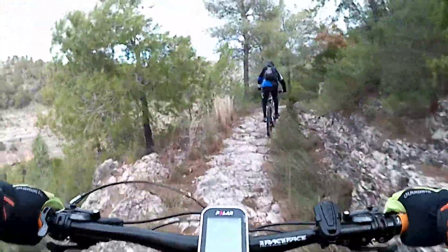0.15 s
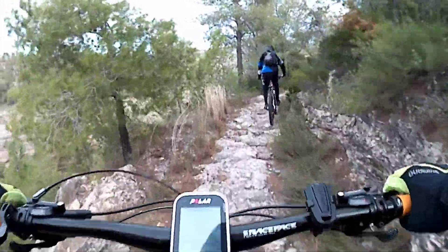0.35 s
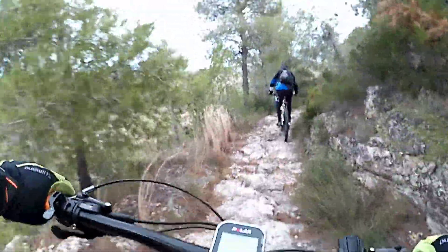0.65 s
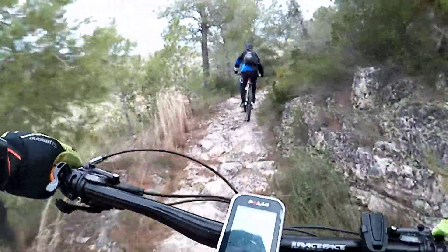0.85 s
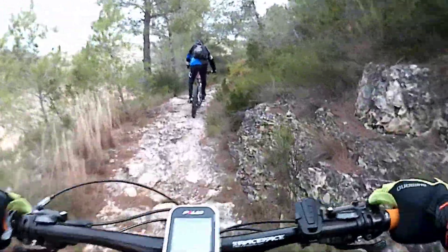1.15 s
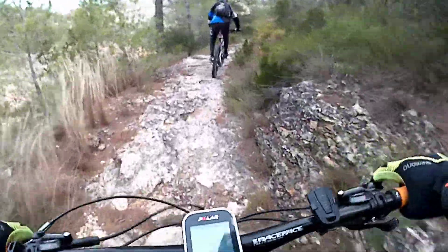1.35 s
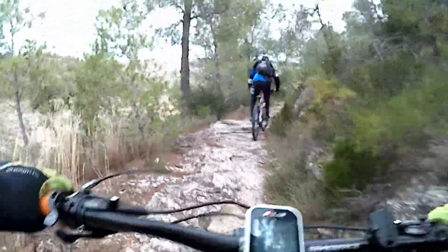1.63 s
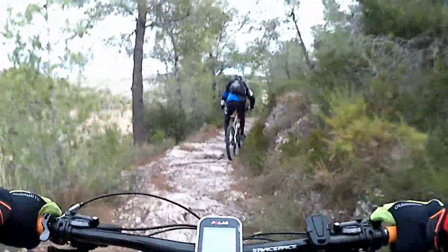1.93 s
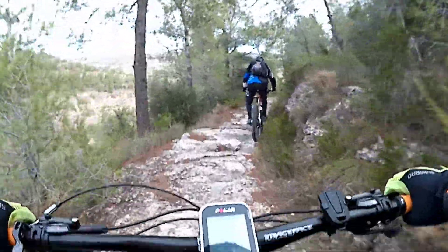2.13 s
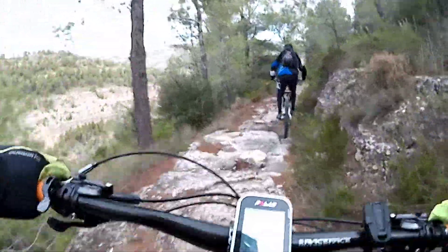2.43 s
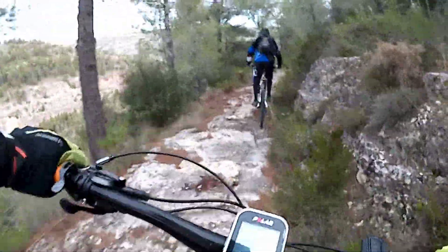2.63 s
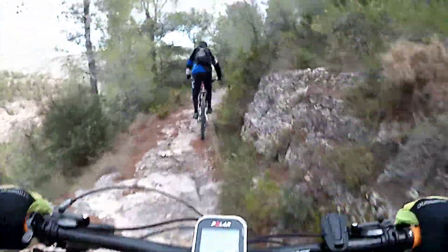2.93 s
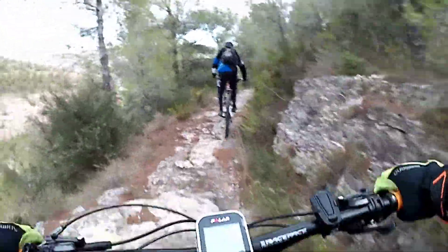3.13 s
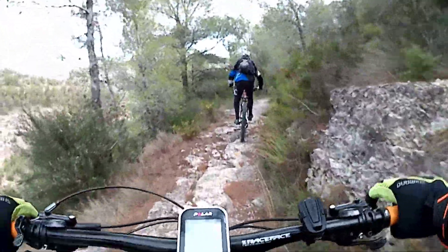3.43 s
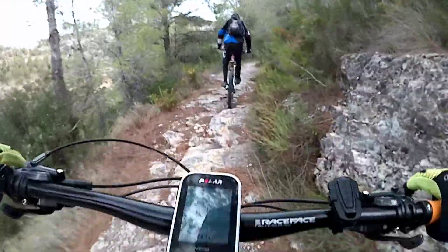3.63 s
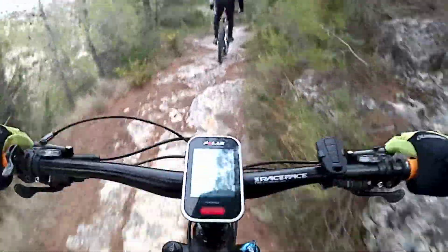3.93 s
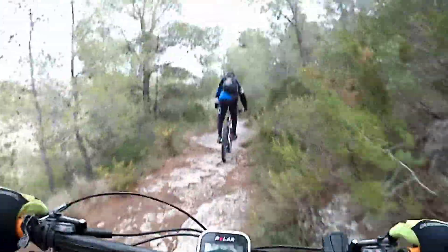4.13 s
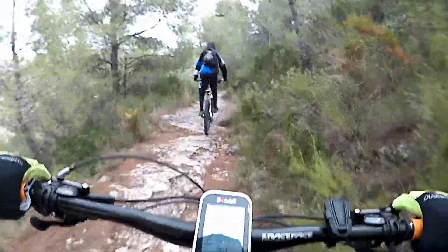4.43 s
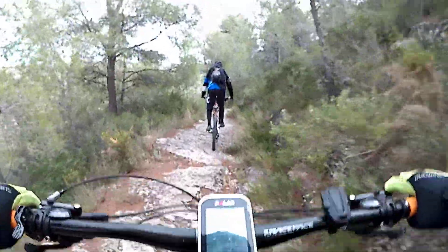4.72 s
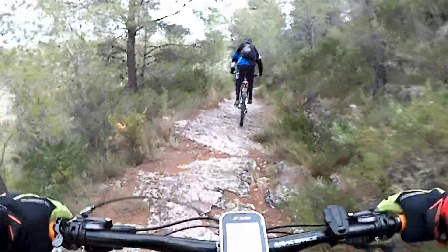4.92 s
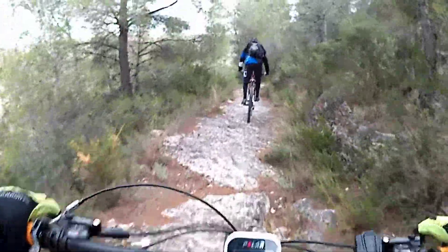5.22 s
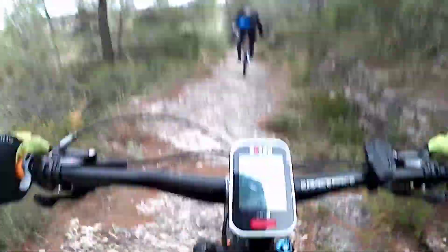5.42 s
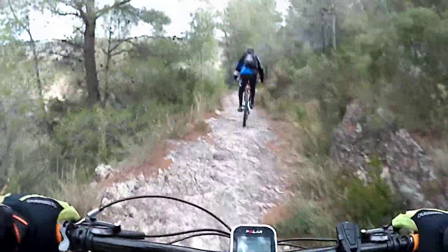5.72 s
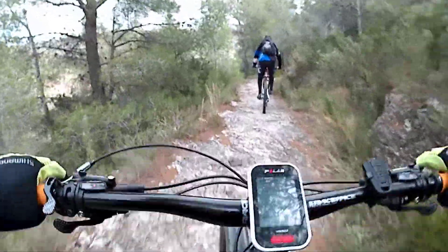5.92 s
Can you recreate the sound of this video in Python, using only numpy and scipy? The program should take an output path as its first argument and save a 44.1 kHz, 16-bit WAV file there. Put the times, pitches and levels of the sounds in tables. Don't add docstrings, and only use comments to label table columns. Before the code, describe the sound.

A mountain bike clatters over rocky ground, the handlebar camera's loose housing knocking and rattling amid heavy low bumps that clip, muffled and harsh.

```python
import sys
import numpy as np
from scipy import signal
from scipy.io import wavfile
from scipy.ndimage import uniform_filter1d

SR = 44100
rng = np.random.default_rng(int(sys.argv[2]) if len(sys.argv) > 2 else 0)


def to_linear_factor(level_db):
    exponent = np.asarray(level_db, float) / 20
    return 10 ** exponent


def store_wav(level_fs):
    pcm = np.round(np.clip(np.atleast_2d(level_fs), -1, 1) * 32767)
    wavfile.write(sys.argv[1], SR, pcm.T.astype(np.int16))


N = 267554

# [t/s, pressure/full scale, duration/ms]
LIFTS = [(0.065, 0.43, 8.1), (0.237, 0.68, 13.5), (0.266, 0.44, 4.2), (0.392, 0.65, 13.8),
         (0.437, 0.36, 8.3), (0.495, 0.4, 2.9), (0.559, 0.73, 9.7), (0.574, 0.28, 10.6),
         (0.739, 0.29, 19.2), (1.104, 0.79, 5.2), (1.187, 0.74, 10.8), (1.215, 0.74, 3.3),
         (1.224, 0.24, 6.0), (1.287, 0.26, 19.6), (1.438, 0.87, 6.4), (1.533, 0.85, 6.3),
         (1.643, 0.58, 10.4), (1.774, 0.37, 12.1), (1.779, 0.89, 3.3), (1.796, 0.47, 4.9),
         (2.031, 0.42, 4.9), (2.226, 1.03, 4.5), (2.293, 0.8, 7.3), (2.422, 0.9, 6.7), (2.435, 0.53, 7.9),
         (2.71, 0.54, 15.5), (2.851, 0.89, 13), (3.035, 0.37, 3.5), (3.037, 0.48, 24.2), (3.056, 0.21, 7.8),
         (3.072, 0.73, 7.0), (3.132, 0.35, 5.2), (3.22, 1.19, 6.4), (3.404, 0.49, 12.1), (3.61, 0.57, 11.6),
         (3.683, 0.44, 3.0), (3.717, 0.79, 5.6), (3.754, 0.63, 3), (4.013, 1.05, 3.3), (4.082, 0.65, 11.8),
         (4.145, 0.48, 6.9), (4.237, 0.75, 12.8), (4.267, 0.44, 4.3), (4.405, 0.22, 14.0),
         (4.42, 1.05, 3.5), (4.599, 0.64, 9.8), (4.796, 0.43, 10.8), (5.062, 0.2, 14.3), (5.161, 0.44, 5.5),
         (5.172, 0.21, 9.2), (5.308, 0.87, 5.8), (5.456, 1.34, 5.4), (5.504, 0.81, 12.1), (5.636, 1, 11.5),
         (5.739, 0.23, 21.0), (5.81, 0.39, 10.2), (5.925, 0.41, 13.4), (6.047, 0.79, 9.1)]
# [t/s, suction/full scale, duration/ms]
DROPS = [(0.009, 0.48, 5.9), (0.023, 0.42, 19.6), (0.11, 0.61, 7.3), (0.156, 0.32, 6.7), (0.214, 0.24, 7.2),
         (0.288, 0.59, 13), (0.311, 0.23, 30.0), (0.423, 0.27, 14.7), (0.465, 0.54, 15.0),
         (0.612, 1.59, 4.7), (0.792, 0.21, 10), (0.973, 0.21, 17.0), (1.105, 1.09, 13.0),
         (1.158, 0.41, 25.8), (1.253, 0.89, 9.5), (1.276, 0.28, 8.2), (1.459, 0.26, 29.9),
         (1.483, 0.56, 13), (1.554, 0.57, 16.6), (1.567, 1.18, 8.0), (1.69, 0.94, 10.6), (1.792, 1.05, 3.3),
         (1.813, 0.36, 25), (1.883, 0.22, 15), (1.939, 1.99, 7.06), (1.944, 0.46, 15.7), (2.053, 0.34, 9.3),
         (2.257, 0.7, 17.1), (2.326, 0.19, 19.6), (2.343, 0.92, 6.4), (2.508, 1.1, 7.1), (2.74, 0.63, 14),
         (2.944, 1.56, 10.1), (2.967, 0.34, 8.4), (3.126, 0.39, 3.0), (3.13, 0.62, 17.2), (3.366, 0.75, 7),
         (3.482, 0.9, 7.8), (3.665, 0.48, 17.1), (3.747, 1.05, 3.0), (3.756, 0.67, 3.3),
         (3.766, 0.36, 30.0), (3.877, 0.22, 17.7), (3.973, 0.19, 14.3), (4.04, 0.38, 14.5),
         (4.154, 0.64, 17.4), (4.328, 1.15, 10.1), (4.415, 0.46, 3.0), (4.439, 0.67, 8.4),
         (4.672, 1.09, 8.2), (4.826, 0.28, 20.1), (4.889, 0.76, 7.7), (5.234, 0.55, 8.5), (5.33, 0.9, 9.0),
         (5.461, 0.83, 20.1), (5.526, 0.66, 7.4), (5.638, 0.8, 3.4), (5.712, 1.6, 6.6), (5.831, 0.62, 7.6),
         (6.009, 0.6, 11.7)]
# [t/s, pressure/full scale (+ up, - down), duration/ms]
NUDGES = [(0.2, -0.15, 15), (0.231, -0.24, 3.5), (0.279, -0.18, 3.5), (0.289, -0.18, 3.5),
          (0.303, -0.16, 5), (0.477, 0.17, 7), (0.53, 0.13, 15), (0.846, -0.12, 15), (1.027, 0.16, 5),
          (1.048, 0.15, 7), (1.078, 0.12, 15), (1.312, -0.19, 7), (1.335, -0.16, 10), (1.511, -0.16, 7),
          (1.661, -0.12, 15), (1.839, 0.14, 10), (2.04, 0.17, 5), (2.189, -0.12, 15), (2.217, 0.22, 5),
          (2.23, 0.18, 5), (2.594, -0.14, 15), (2.647, 0.12, 15), (2.812, -0.13, 15), (3.228, -0.2, 3.5),
          (3.242, -0.17, 5), (3.355, -0.17, 7), (3.391, -0.2, 3.5), (3.43, 0.17, 10), (3.474, 0.14, 10),
          (3.535, -0.11, 15), (3.713, -0.19, 3.5), (3.739, -0.16, 15), (3.757, 0.18, 3.5),
          (3.811, 0.15, 15), (3.937, 0.15, 7), (3.989, -0.13, 7), (4.02, -0.28, 3.5), (4.156, 0.19, 3.5),
          (4.19, 0.11, 15), (4.296, 0.12, 10), (4.352, 0.15, 10), (4.417, 0.36, 3.5), (4.426, -0.22, 3.5),
          (4.897, -0.21, 3.5), (5.191, -0.21, 3.5), (5.261, 0.13, 15), (5.302, -0.23, 3.5),
          (5.373, 0.16, 15), (5.443, 0.22, 3.5), (5.515, 0.18, 3.5), (5.7, -0.14, 7), (5.72, -0.18, 5),
          (5.947, 0.17, 5), (5.997, -0.13, 15), (6.006, 0.22, 3.5), (6.01, -0.2, 3.5)]


def jolts():
    out, t = np.zeros(N), np.arange(N) / SR
    falls = [(s, -suction, ms) for s, suction, ms in DROPS]
    for s, push, width_ms in [*LIFTS, *falls, *NUDGES]:
        near = slice(max(int((s - .06) * SR), 0), int((s + .06) * SR))
        offset_ms = (t[near] - s) * 1000
        out[near] += push * np.exp(-4 * np.log(2) * (offset_ms / width_ms) ** 2)
    vent_hz = 11.2
    return signal.lfilter(*signal.butter(1, vent_hz, "high", fs=SR), out)


def ring(x, hz, width_hz):
    return signal.lfilter(*signal.iirpeak(hz, hz / width_hz, fs=SR), x)


def modes(x, table):
    return sum((-1) ** k * to_linear_factor(db) * ring(x, hz, w) for k, (hz, w, db) in enumerate(table))


def clicks(shape, rate_hz, scatter_db):
    struck = rng.random(shape) < rate_hz / SR
    size = np.minimum(rng.exponential(size=shape), 3)
    return struck * np.sign(rng.standard_normal(shape)) * to_linear_factor(scatter_db * size)


# [f/Hz, width/Hz, level/dB]
SHELL = [(1490, 1200, 12.5), (2120, 590, 11), (3010, 4300, -2.5), (3870, 910, -20.5)]


def knocks(rows, chatter_ms):
    span = 2600
    out, ms = np.zeros(N + span), np.arange(span) * 1000 / SR
    rebounds = clicks((len(rows), span), 2200, scatter_db=1.0)
    first = ms == ms[30]
    envelope = np.minimum(ms / 1.1, 1) * np.exp(-(ms / chatter_ms) ** 2)
    for (s, db, hz, treble_db, thud_db), contact in zip(rows, rebounds):
        force = (contact + first) * envelope
        parts = ring(force, hz, 0.24 * hz), modes(force, SHELL), ring(force, 262, 80)
        part, shell, thud = (p / np.abs(p).max() for p in parts)
        at = int(s * SR)
        out[at:at + span] += to_linear_factor(db) * (part + to_linear_factor(treble_db - 6) * shell + to_linear_factor(thud_db) * thud)
    return out[:N]


# [t/s, peak/dB, f/Hz, treble/dB]
CLACKS = [(1.073, -10.5, 421, -13), (2.213, -5.5, 741, -10), (2.2215, -5, 1026, -4.5),
          (.26, -4.5, 1388, -4.5), (0.901, -6.5, 973, -13), (0.308, -5.5, 1035, -17.5), (0.568, -6, 967, 2),
          (.761, -9.5, 947, 2), (1.01, -7, 516, -27.5), (1.21, -4, 450, 3), (1.54, -1.5, 774, -9),
          (1.585, -4.5, 834, -9.5), (2.024, -8, 800, -22.5), (2.161, -7.5, 1074, -12.5),
          (2.4334, 4.5, 595, -19), (2.479, -8, 556, -3), (2.9585, -4, 744, -8), (3.22, 1, 600, -23.5),
          (4.087, -7, 923, -1), (4.133, -6, 1370, -20), (4.262, 0, 945, -3.5), (4.613, -6, 1098, -9.5),
          (5.227, -9, 900, -17), (5.638, -8.5, 1106, -4), (5.943, -6, 1020, -14.5),
          (6.052, -5.5, 1020, -13.5)]


def clacks():
    return knocks([(*r, -12) for r in CLACKS], chatter_ms=5)


# [t/s, peak/dB, f/Hz, treble/dB]
COMPANIONS = [
    (2.4295, -1, 1100, -8.5),
    (4.257, -6, 900, 0),
    (4.9435, -9, 1600, -7.5),
    (1.586, -8, 1000, -5.5),
    (5.451, -8, 900, -6.5),
    (3.741, -7, 800, -10),
    (2.107, -17, 700, -10),
    (.496, -12, 900, -2),
    (1.942, -12, 900, -5),
    (4.041, -18, 1000, -5),
]


def companions():
    return knocks([(*r, -12) for r in COMPANIONS], chatter_ms=5)


# [t/s, peak/dB, f/Hz, thud/dB]
THUMPS = [(0.231, -10.5, 682, -10.5), (1.063, -12.5, 944, 3), (1.095, -24.5, 1140, 9.5),
          (1.191, -20, 530, 2), (1.306, -19.5, 1440, 0), (1.397, -9.5, 703, -23), (1.774, -7, 970, -10),
          (1.792, -8.5, 858, 0), (1.92, -22.5, 1640, -3), (1.942, -11.5, 825, 1), (2.331, -15.5, 1034, 1),
          (3.115, -14, 1133, -9), (3.357, -17.5, 820, 7), (3.422, -18, 450, 2.5), (3.46, -21, 1760, -3),
          (3.682, -17.5, 475, 10), (3.807, -25.5, 770, 14), (4.004, -10, 704, -4),
          (4.179, -13.5, 1290, -9.5), (4.412, -7, 695, -12), (4.549, -21, 945, -23), (4.663, -15, 970, 1.5),
          (4.9375, -6, 713, -12), (5.156, -12, 927, -6), (5.276, -13.5, 940, 2.5), (5.437, -24.5, 480, 5),
          (5.444, -6.5, 535, -0.5), (5.633, -23, 610, 10.5), (5.702, -24, 960, 13),
          (6.004, -11.5, 1146, -3.5)]


def thumps():
    return knocks([(s, db, hz, -5.5, thud_db) for s, db, hz, thud_db in THUMPS], chatter_ms=6.5)


# [t/s, peak/dB, f/Hz, treble/dB]
SCRAPES = [(1.03, -11, 1486, -14.5), (1.045, -12.5, 1490, -15), (1.492, -17.5, 920, -9),
           (3.932, -14, 867, -19), (4.032, -16, 1006, -10.5), (5.198, -14.5, 1292, -11),
           (5.238, -17, 1060, -9), (5.346, -20, 1280, -14.5), (0.104, -25, 1093, 3), (.495, -11, 776, -3.5),
           (1.144, -7.5, 715, -29), (1.244, -9.5, 1170, -14), (1.476, -8, 530, -4), (1.874, -21, 614, 6),
           (2.092, -12.5, 714, -46.5), (2.302, -14, 552, -12), (2.794, -23.5, 534, -28),
           (3.037, -21, 885, -12), (3.064, -5, 863, 2), (3.42, -10, 802, 3.5), (3.711, -9.5, 904, -15),
           (3.74, -16, 702, -12), (3.917, -10.5, 812, -14.5), (4.452, -28.5, 1220, -9),
           (4.823, -20, 1410, -3), (4.885, -12.5, 1103, -25), (5.183, -14, 804, -12),
           (5.787, -22.5, 890, 12.5)]


def scrapes():
    return knocks([(*r, -16) for r in SCRAPES], chatter_ms=12)


# [t/s, peak/dB, f/Hz]
TAPS = [(.004, -14.5, 996), (0.197, -18.5, 1306), (3.225, -6.5, 390), (.33, -16.5, 900), (.94, -20.5, 1000),
        (1.377, -23.5, 1790), (0.074, -14.5, 860), (0.183, -21, 1320), (.399, -33, 876), (.604, -14, 843),
        (0.691, -22, 700), (.804, -40.5, 999), (1.437, -12.5, 477), (2.371, -21.5, 1120),
        (2.409, -40, 1400), (2.454, -34.5, 756), (2.633, -22.5, 455), (2.686, -23, 713), (3.24, -10, 1160),
        (3.264, -13.5, 817), (3.292, -25, 547), (3.476, -13, 866), (3.63, -16, 844), (3.993, -18, 1386),
        (4.803, -15, 972), (5.147, -39.5, 910), (5.308, -28.5, 835), (5.334, -33, 1460),
        (5.507, -14.5, 1076)]


def taps():
    return knocks([(*r, 5, -11.5) for r in TAPS], chatter_ms=4.5)


# [t/s, peak/dB, f/Hz]
TICKS = [(0.0235, -19, 1001), (0.1035, -15, 1119), (0.2125, -17.5, 1356), (0.3305, -19, 1356),
         (0.4005, -23, 1087), (0.4495, -25, 656), (0.5445, -23, 796), (0.7125, -26, 678),
         (0.8035, -24, 990), (0.9415, -21, 861), (0.9885, -24, 721), (1.0275, -14, 1582),
         (1.0945, -11, 1076), (1.2565, -11, 1184), (1.2715, -13, 635), (1.3015, -14, 1324),
         (1.3765, -16, 1830), (1.6595, -25, 588), (1.7345, -25, 1140), (1.9215, -19, 1658),
         (2.1315, -26, 613), (2.3705, -16, 1184), (2.4575, -17, 775), (2.5735, -26, 742),
         (2.6085, -28, 1335), (2.6875, -15, 785), (2.7005, -25, 689), (2.8425, -26, 570),
         (2.8595, -25, 592), (3.1825, -25, 1496), (3.2915, -18, 689), (3.3765, -26, 775),
         (3.4425, -26, 678), (3.5135, -27, 958), (3.6005, -26, 968), (3.6145, -24, 1421),
         (3.7305, -14, 882), (3.8645, -26, 818), (3.9305, -14, 807), (3.9595, -21, 807), (4.0205, -17, 904),
         (4.5255, -25, 1012), (4.7035, -28, 882), (4.7105, -29, 1173), (4.7915, -25, 818),
         (4.8435, -24, 1841), (4.8835, -13.5, 1033), (5.2375, -10, 839), (5.2755, -9, 1291),
         (5.3125, -13, 904), (5.3335, -17, 1431), (5.7225, -21, 753), (5.7345, -24, 721),
         (5.9955, -21.5, 1044)]


def ticks():
    return knocks([(*r, 0, -15) for r in TICKS], chatter_ms=3)


# [t/s, peak/dB, f/Hz, 60 dB decay/s]
BOOMS = [
    (4.9392, -3.5, 250, .062),
    (5.266, -16, 290, .25),
    (2.795, -22, 300, .25),
    (1.47, -19.5, 285, 0.17),
    (3.79, -20.5, 270, 0.13),
    (1.012, -19, 300, .2),
    (3.47, -20, 275, 0.11),
    (2.4345, -4, 600, .02),
    (3.05, -18, 400, .1),
    (3.222, -6, 740, .03),
]


def booms():
    out, t = np.zeros(N + SR), np.arange(SR // 2) / SR
    for s, db, hz, t60_s in BOOMS:
        at = int(s * SR)
        out[at:at + len(t)] += to_linear_factor(db - 60 * t / t60_s) * np.sin(2 * np.pi * hz * t)
    return out[:N]


def unit(x):
    return x / np.sqrt(np.mean(x ** 2))


def walk(rate_hz):
    k = int(SR / rate_hz)
    held = np.repeat(rng.standard_normal(N // k + 1), k)
    return 1.3 * uniform_filter1d(uniform_filter1d(held, k), k)[:N]


# [t/s, looseness/dB, tyre load/dB]
ROUGH = [(0.1, -31, -41.5), (0.98, -36, -30.5), (1.05, -27, -36.5), (1.27, -26.5, -34.5), (1.4, -34, -24.5),
         (1.859, -38, -38.5), (2.36, -27.5, -36.5), (2.62, -36.5, -30.5), (2.89, -34.5, -32.5),
         (3.26, -34, -35), (3.65, -42, -35.5), (3.94, -30.5, -34), (4.43, -39, -35.5), (4.7, -39.5, -43),
         (5.14, -40, -35), (5.25, -27, -30), (5.45, -38, -38), (6.07, -38, -36)]


def ground_db(column):
    table = np.transpose(ROUGH)
    return np.interp(np.arange(N) / SR, table[0], table[column])


# [f/Hz, density/dB per Hz]
RATTLE = [(350, -0.5), (540, 2), (920, 4), (1480, -1.5), (2300, -21.5), (3300, -14.5), (4100, -13.5)]


def rattle(blows):
    force = unit(clicks(N, 500, scatter_db=3.2)) + .5 * rng.standard_normal(N)
    hz, db = np.transpose(RATTLE)
    out, flurry, lull = 0, walk(70), walk(18)
    for f in 400 * 2 ** np.arange(0, 3.5, 1 / 3):
        flicker_db = np.minimum(1.5 * flurry + lull + 2.2 * walk(40), 3.5)
        band_db = np.interp(np.log(f), np.log(hz), db) + 10 * np.log10(f) + flicker_db
        band = ring(ring(force, f, f / 2.5), f, f / 2.5)
        out = out + to_linear_factor(band_db) * unit(band)
    settle_s, shake_db = .03, -16.5
    stay = np.exp(-1 / (settle_s * SR))
    shaken = np.sqrt(signal.lfilter([1 - stay], [1, -stay], blows ** 2)) * to_linear_factor(shake_db)
    return (to_linear_factor(ground_db(column=1) - 3.5) + shaken) * unit(out)


# [f/Hz, width/Hz, level/dB]
HUM = [(326, 94, 9), (165, 130, 6), (421, 68, -4), (277.6, 40, 7.5)]


def hum():
    force = unit(clicks(N, 250, scatter_db=4.5)) + 0.57 * rng.standard_normal(N)
    return to_linear_factor(ground_db(column=2) - 1.5) * unit(to_linear_factor(2.2 * walk(30)) * modes(force, HUM))


# [t/s, level/dB]
ROCKING = [(0.0, -34.5), (0.15, -31), (0.81, -30.5), (1.15, -31), (1.69, -31.5), (2.06, -34.5),
           (2.399, -29.5), (2.53, -36.5), (3.95, -31.5), (4.83, -35.5), (4.95, -34.5), (5.19, -40.5),
           (5.34, -31), (6.07, -35)]


def sway():
    shake = to_linear_factor(1.8 * walk(30)) * rng.standard_normal(N)
    rocking_db = np.interp(np.arange(N) / SR, *np.transpose(ROCKING))
    return to_linear_factor(.4 + rocking_db) * unit(ring(shake, 50, 75) + to_linear_factor(-9) * ring(shake, 88, 31))


def scene():
    blows = clacks() + thumps() + scrapes() + taps()
    mix = jolts() + blows + companions() + ticks() + booms()
    return (mix + rattle(blows) + hum() + sway())[None]


def starve(x):
    block, lead = 128, 16
    low = np.pad(signal.resample_poly(x, 80, 441), (2 * block - lead, 3 * block))
    n, k = np.arange(2 * block)[:, None] + .5, np.arange(block) + .5
    window = np.sin(np.pi * n / (2 * block))
    basis = window * np.cos(np.pi / block * (n + block / 2) * k) * np.sqrt(2 / block)
    place = np.arange(len(low) // block - 1)[:, None] * block + np.arange(2 * block)
    lines = low[place] @ basis
    loud_db = 10 * np.log10(np.mean(lines[:, 12:] ** 2, axis=1) + 1e-9)
    bass_db = 10 * np.log10(np.mean(lines[:, :4] ** 2, axis=1) + 1e-9)
    frame = (np.arange(len(lines)) - 1) // 8
    held_db = np.array([loud_db[frame == f].max() for f in frame])
    crest_db = held_db - np.array([np.median(loud_db[frame == f]) for f in frame])
    shove_db = np.array([bass_db[frame == f].max() for f in frame])
    draws = rng.standard_normal((len(lines) // 2 + 1, block // 8))
    bands = np.kron(draws, np.ones((2, 8)))[:len(lines)]
    step_db = .8 * held_db + .33 * crest_db + .2 * shove_db - 21
    step = to_linear_factor(step_db[:, None] + 3 * bands)
    rounded = np.sign(lines) * np.floor(np.abs(lines) / step + .4) * step
    out = np.zeros(len(low))
    np.add.at(out, place, rounded @ basis.T)
    wide = signal.resample_poly(out[2 * block - lead:], 441, 80, window=("kaiser", 9))[:N]
    top_hz = 4260
    return signal.sosfiltfilt(signal.butter(8, top_hz, fs=SR, output="sos"), wide)


def top_cut(x):
    return signal.sosfilt(signal.butter(12, 17200, fs=SR, output="sos"), x)


def record(dry):
    ceiling = .7
    narrow = starve(dry[0])[None] / ceiling
    clipped = ceiling * narrow / (1 + narrow ** 30) ** (1 / 30)
    return top_cut(clipped)


dry = scene()
out = record(dry)
store_wav(out)
```